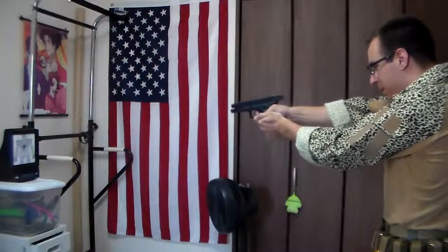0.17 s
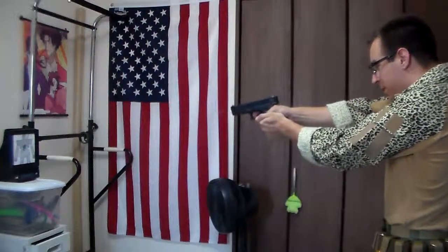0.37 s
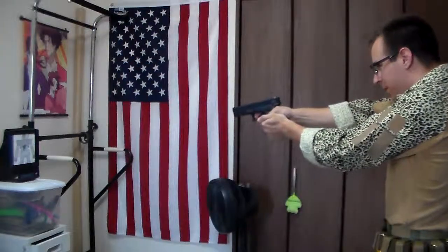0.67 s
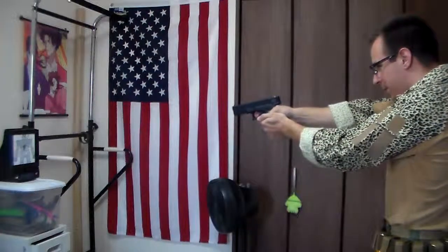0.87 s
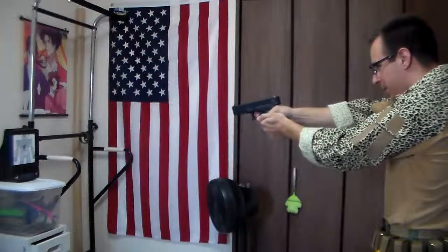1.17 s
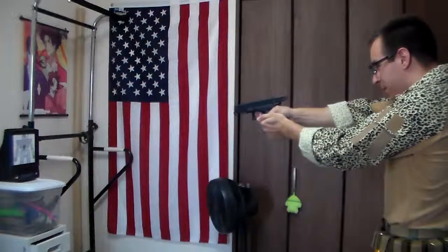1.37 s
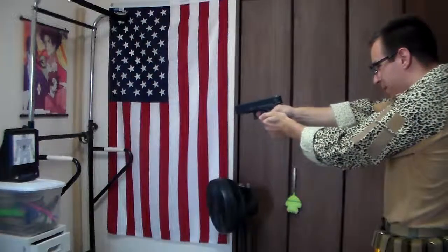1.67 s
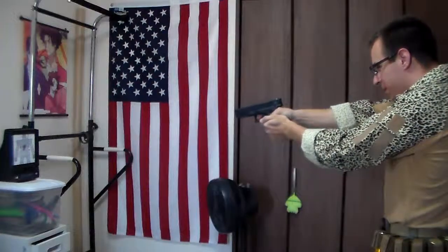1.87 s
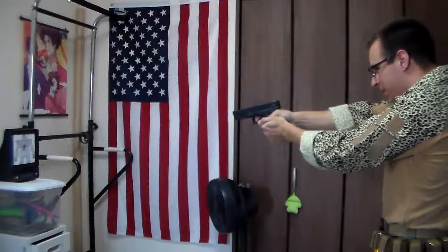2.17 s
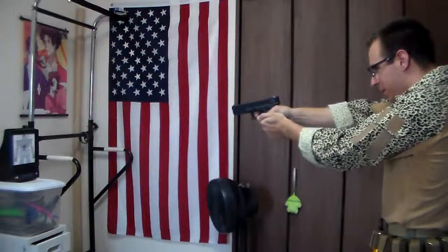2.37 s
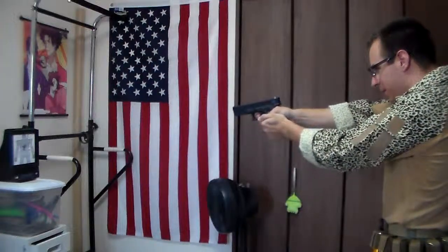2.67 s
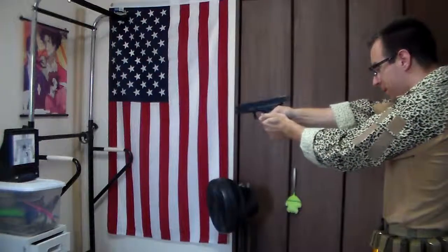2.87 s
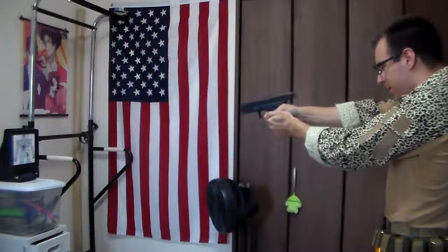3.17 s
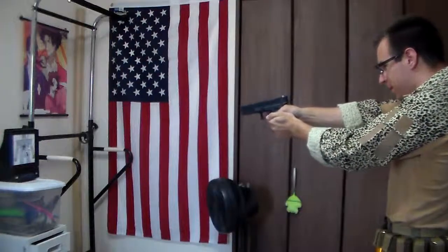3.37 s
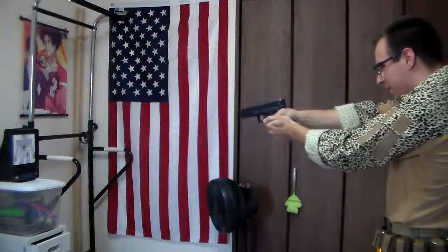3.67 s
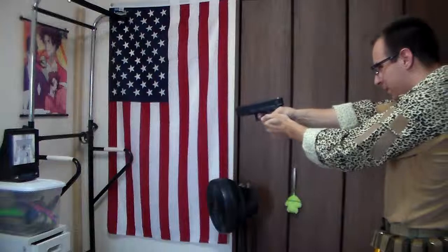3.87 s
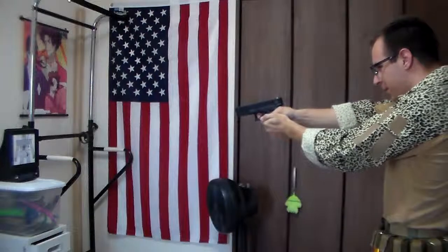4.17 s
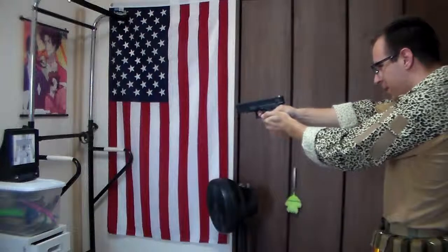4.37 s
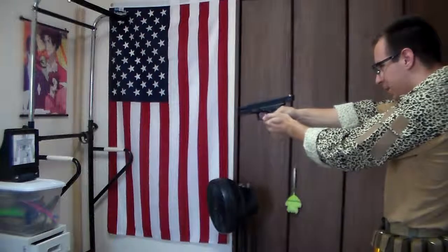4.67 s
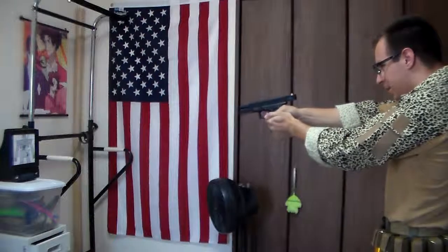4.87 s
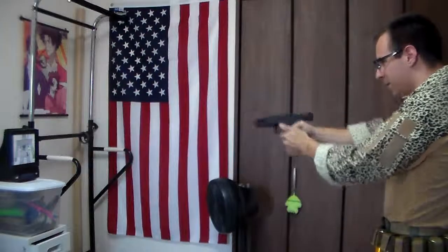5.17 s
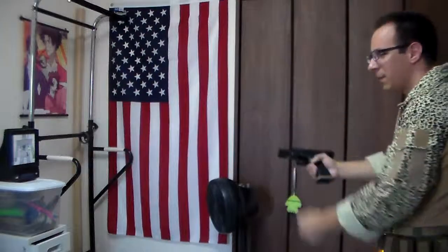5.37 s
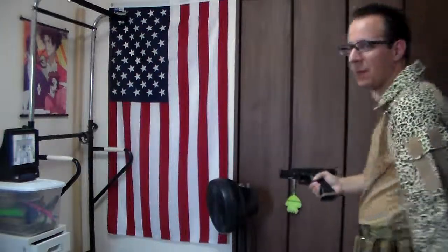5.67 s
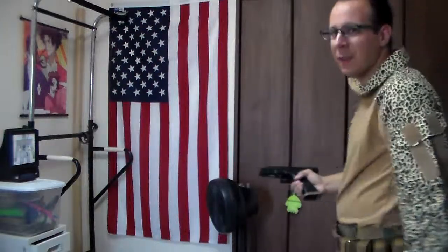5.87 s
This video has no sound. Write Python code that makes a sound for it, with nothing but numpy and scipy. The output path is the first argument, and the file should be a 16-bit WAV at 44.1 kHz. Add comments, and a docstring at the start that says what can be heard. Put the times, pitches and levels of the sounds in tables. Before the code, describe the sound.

A close stereo microphone in a small, dry room, with faint low rumble and hiss underneath. Almost at once, 0.07 s, a gas pellet pistol fires six rounds in about 0.3 s: a sharp opening crack, then a buzzing chain of gas bursts, metallic slide clatter and boxy low thumps. From 0.46 to 1.45 s plastic pellets click, bounce and roll on a ringing panel. A seven-round burst runs from 1.47 to 1.8 s, with pellets pattering and fading until 2.75 s. A mechanism click at 2.86 s leads into eleven rounds, 2.91 to 3.5 s, slowing and weakening slightly; duller landings and brief rolling follow, thinning by 4.4 s. A click at 4.68 s, then one crisp shot at 4.72 s. The background dips nearly silent around 5.2 s, then bright pellet ticks at 5.23-5.48 s, soft rustle, dull knocks and small metal clicks until 6 s.

```python
"""A gas blowback pistol fires three quick bursts and one last shot in a small, dry room.
Each shot layers a hammer tick, a ringing muzzle crack, gas and slide clatter, and a low thump of room modes.
After the shots plastic pellets click, roll and patter on a ringing panel, made of impulses and resonators.
Mechanism clicks precede later bursts and follow the last shot; a low rumble and hiss lie underneath."""
import sys
import numpy as np
from scipy import signal
from scipy.fft import rfft, irfft
from scipy.io import wavfile

SR = 44100
rng = np.random.default_rng(int(sys.argv[2]) if len(sys.argv) > 2 else 0)


def put_to_file(sound):
    """Save the sound as 16-bit audio at rate SR, in the file named by the first command-line argument."""
    columns = np.atleast_2d(sound).T  # one column per channel
    safe = np.clip(columns, -1, 1)
    whole_steps = np.round(safe * 32767)
    wavfile.write(sys.argv[1], SR, whole_steps.astype(np.int16))


def field_ratio(decibels):
    """Amplitude ratio for a level in dB (20 dB per decade); scalars and array-likes work."""
    return 10 ** (np.asarray(decibels, dtype=float) / 20)


N = 265261

# Levels in dB are relative, ahead of each layer's filters and mix gain.
# Burst timing: first_crack_s, rounds, first_cycle_s, lengthening_per_cycle_s
BURST_TIMING = [(.066, 6, .0483, .0006), (1.4664, 7, .0501, .0002), (2.911, 11, .0515, .0007),
                (4.7182, 1, .05, 0)]
# Burst strength: clatter_db, last_round_loss_db, opening_crack_db
BURST_STRENGTH = [(-18.5, -1, -3), (-19.5, 9, -2.5), (-20, 6, -2.5), (-23, -2, -2)]
# Clatter colour: freq_hz, density_db_per_hz
CLATTER_COLOUR = [(320, -54.5), (550, -9.5), (694, -11), (964, -5), (2250, 1.5), (3220, -2), (3590, 3.5),
                  (4230, 0.5), (6040, 2.5), (13500, -6.5), (14500, -22)]
# Slide resonances: freq_hz, width_hz, level_db
SLIDE_MODES = [(1921, 53, 3), (2540, 27, -12), (2960, 120, 5), (3860, 120, -1), (4320, 20, -15),
               (6000, 24, -11)]
# Top hiss of the gas against the clatter, one entry per burst: level_db
GAS_HISS_DB = [-8.5, -2.5, -11, -9]
# Low pushes in one cycle, from gas release, pellet impact and slide stops: lag_from_crack_s, level_db
CYCLE_PUSHES = [(-.0035, -2), (.0085, 2), (0.0129, -6), (0.0211, 2.5), (.030, -16.5), (0.041, -6.5)]
# Low room modes: freq_hz, width_hz, level_db
LOW_MODES = [(327, 69, -3), (372, 34, 1.5), (421, 18, 3), (496, 30, -1.5), (532, 105, -10), (628, 22, -4),
             (700, 18, -1), (797, 143, -6.5), (995, 180, -7)]
# Lowest room modes, beating: freq_hz, width_hz, level_db
LOWEST_MODES = [(89.7, 6.7, -12.5), (194, 6.7, 0), (228.7, 6.4, 1)]
# Pellets landing: start_s, level_db, brightness_db, panel_ring_db
PELLET_LANDINGS = [(0.4643, -22, 5, -7), (.4965, -33.5, 16, 6), (.636, -21, -2, -3.5),
                   (0.6793, -18.5, -3.5, -8), (0.6883, -18, 1, -5), (.829, -23, -3, -4),
                   (0.9781, -30.5, 4, 4.5), (1.044, -35, 6.5, 8), (1.2582, -21.5, -2.5, -5),
                   (1.9732, -16.5, 4, -12), (2.0468, -21, -1, -4.5), (2.0794, -23, -4.5, -6),
                   (2.2279, -26, 6, 1), (2.369, -49, -11, 3), (2.4715, -37, -6, -3.5),
                   (2.5993, -40, -4, 1.5), (3.676, -28.5, -13, -12), (3.739, -21, -3, -11),
                   (3.804, -28.5, -0.5, -3), (3.829, -30.5, -1, -1), (3.93, -38.5, 2, 1.5),
                   (3.947, -41, 4, 2), (4.144, -50.5, -4.5, 1.5), (4.2123, -37.5, -10.5, -8.5),
                   (4.2457, -46.5, -4.5, 1), (4.9921, -39.5, 7.5, -3.5), (5.2329, -29, -1, -3.5),
                   (5.345, -32.5, -3, -2.5), (5.3725, -22.5, 6, 2), (5.3852, -33, -5, -1),
                   (5.4103, -33, 10, -8), (5.4302, -31, 2, 4.5), (5.4596, -30.5, 5, 3),
                   (5.4778, -48, -5, -1)]
# Panel resonances: freq_hz, width_hz, level_db
PANEL_MODES = [(1766, 190, -11), (2508, 160, -3), (2708, 80, 2), (2822, 79, 0.5), (3112, 66, -1),
               (3531, 66, 4.5), (3740, 540, -4.5), (4360, 200, -4), (5230, 310, -6), (5680, 240, -2.5),
               (6960, 560, -8.5), (8240, 380, -6)]
# Pellets rolling on the panel: start_s, stop_s, start_db, stop_db, second_group_db
ROLLS = [(.49, .52, -31.5, -55, -11), (0.64, 1.459, -39.5, -44, 1), (2.045, 2.751, -44.5, -54.5, -1),
         (3.58, 3.862, -47.5, -49.5, -0.5), (3.93, 4.03, -43, -71, -6), (4.215, 4.415, -60, -70, -6),
         (5.235, 5.34, -52, -52, -6), (5.384, 5.517, -45, -66, -2)]
# Edges of the second resonance group of the rolls: low_hz, high_hz
SECOND_GROUP_HZ = (3250, 4000)
# Fine patter and rustle: start_s, stop_s, start_db, stop_db
RUSTLE_STRETCHES = [(.47, 1.46, -42.5, -47), (1.82, 2.4, -45, -55), (3.54, 3.85, -37, -67.5),
                    (5.24, 5.33, -50, -61), (5.38, 5.58, -40, -62), (5.6, 6.01, -60, -64.5)]
# Rustle colour: freq_hz, density_db_per_hz
RUSTLE_SPECTRUM = [(290, -61), (500, -23), (2130, -8.5), (2360, -10), (2830, -4.5), (4020, -10.5),
                   (6870, -7.5), (14500, -22)]
# Dull knocks: start_s, level_db
DULL_KNOCKS = [(3.676, -37), (3.817, -52.5), (5.565, -45.5), (5.739, -49.5), (5.769, -53)]
# Band left of a knock: low_hz, high_hz
KNOCK_BAND_HZ = (250, 1000)
# Trigger, slide catch and magazine clicks: start_s, level_db, brightness_db
MECHANISM_CLICKS = [(1.4314, -49.5, 1), (2.8594, -32.5, -9), (4.6799, -28.5, -6.5), (5.5571, -32, -3),
                    (5.569, -33.5, -1), (5.7599, -37.5, -3), (5.844, -45, -10), (5.9374, -41, -3)]
# Room decay: freq_hz, t60_s
ROOM_DECAY = [(120, 0.22), (700, 0.28), (3000, 0.25), (12000, 0.25)]
# Likeness of left and right, for tail and room tone: freq_hz, correlation
STEREO_LIKENESS = [(30, 0.77), (125, 0.76), (300, 0.88), (700, 0.92), (1400, 0.97), (2500, 0.97),
                   (5000, 0.48), (8000, 0.026)]
# Room tone level, sinking after the last shot and jumping back: time_s, level_db
ROOM_TONE_LEVEL = [(0, -51.5), (2.8, -53.5), (4.7, -54), (4.8, -59), (5.205, -79), (5.211, -56),
                   (6.02, -50.5)]
# Room tone colour: freq_hz, density_db_per_hz
ROOM_TONE_COLOUR = [(12, -25.5), (20, 5), (39, -7.5), (60, -10.5), (102, -16.5), (546, -24), (610, -27),
                    (681, -23), (1280, -30.5), (2700, -32), (2930, -34.5), (14500, -48.5)]

# Sag per round as the gas cools
CLATTER_SAG_DB, THUMP_SAG_DB = 0.17, 0.63
# Thump against clatter, and its multiple of the last-round loss
THUMP_DB, THUMP_LOSS = -6.5, 1.5
OPENING_THUMP_DB = 2  # a full charge makes the first round of a burst thump harder
LATER_CRACK_DB, ROUND_SPREAD_DB = -14, 0.6
VALVE_LEAD_S, VALVE_DB = 0.0035, 4  # gas hisses from the valve until the crack
LULL_S, LULL_DB = 0.0018, -24.5  # a short lull after the crack
# The slide slams back, fades and comes home
SLAM_S, SLAM_DB, SLAM_FADE_DB_PER_S, HOME_S, EDGE_S = 0.0032, 5, 480.5, 0.043, 0.002
GAS_HZ = 8790
CRACK_HZ, CRACK_DECAY_S = 3500, 0.00023
HAMMER_LEAD_S, HAMMER_HZ, HAMMER_DECAY_S, HAMMER_DB = 0.00303, 1730, 0.00015, -9
# Low-middle and middle ranges of a hard click
CLICK_LOW_DB, LANDING_MID_DB, MECHANISM_MID_DB = -2.5, -5.5, 2
ROLL_TOP_DB = -9.5  # rolling hardly rings the top resonances
SWELL_S = 0.027  # rolls and patter set in and end over this time
HISS_DB = -63
STOPBAND_HZ = 14350


def rms_one(x):
    """Scale to unit rms."""
    return x / np.sqrt(np.mean(x ** 2) + 1e-20)


def at_hz(points, hz):
    """Read a curve on a log-frequency axis."""
    point_hz, value = np.transpose(points)
    return np.interp(np.log(hz), np.log(point_hz), value)


def butter_filter(x, order, hz, kind):
    """Butterworth filter with a flat passband."""
    return signal.sosfilt(signal.butter(order, hz, kind, fs=SR, output="sos"), x)


def gain_curve(tables):
    """Sum gain envelopes from lists of (s, dB) rows, practically silent outside them."""
    t = np.arange(N) / SR
    return sum(field_ratio(np.interp(t, *np.transpose(rows), left=-200, right=-200)) for rows in tables)


def stretches(rows):
    """Envelope of sounds that set in, glide from one level to another and end."""
    return gain_curve([
        [(start - SWELL_S, start_db - 30), (start, start_db), (stop, stop_db), (stop + SWELL_S, stop_db - 30)]
        for start, stop, start_db, stop_db in rows])


def coloured(x, spectrum):
    """Give a white signal a spectrum in dB per Hz; rms 1."""
    hz = np.maximum(np.arange(N // 2 + 1) * SR / N, 1)
    return rms_one(irfft(rfft(x) * field_ratio(at_hz(spectrum, hz)), N))


def resonate(x, modes):
    """Parallel two-pole resonances of alternating sign; bandwidth sets the ring time."""
    out = 0
    for k, (hz, width, db) in enumerate(modes):
        radius = np.exp(-np.pi * width / SR)
        top = (-1) ** k * field_ratio(db) * (1 - radius * radius) / 2
        poles = [1, -2 * radius * np.cos(2 * np.pi * hz / SR), radius * radius]
        out = out + signal.lfilter([top, 0, -top], poles, x + 1e-18)
    return out


def grains(per_s, spread_db):
    """Random clicks of uneven size and sign; rms 1."""
    size = field_ratio(spread_db * np.minimum(rng.exponential(1, N), 5))
    sign = rng.choice([-1, 1], N)
    return rms_one(size * sign * (rng.random(N) < per_s / SR))


def clicks(times, gains):
    """A train of single-sample impulses."""
    out = np.zeros(N)
    out[np.round(np.asarray(times) * SR).astype(int)] = gains
    return out


def hard_clicks(rows, mid_db):
    """A hard contact in three ranges; brightness trades low middle for treble."""
    s, db, bright_db = np.transpose(rows)[:3]
    ranges = [(CLICK_LOW_DB - bright_db, (900, 2200)), (mid_db, (2200, 4800)), (bright_db, (4800, 13000))]
    out = 0
    for share_db, edges_hz in ranges:
        # alternate signs so that the ranges join
        out = butter_filter(clicks(s, field_ratio(db + share_db)), 2, edges_hz, "band") - out
    return out


def shots():
    """As the gas cools, each cycle is slower and weaker: rows of start_s, clatter_db, thump_db, crack_db."""
    rows = []
    for timing, strength in zip(BURST_TIMING, BURST_STRENGTH):
        first_s, count, cycle_s, slower_s = timing
        db, loss_db, crack_db = strength
        k = np.arange(count)
        loss = loss_db * (k == count - 1)
        start_s = first_s + cycle_s * k + slower_s * k * (k - 1) / 2
        clatter_db = db - CLATTER_SAG_DB * k - loss
        thump_db = db + THUMP_DB - THUMP_SAG_DB * k - THUMP_LOSS * loss + OPENING_THUMP_DB * (k == 0)
        # a burst opens with its sharpest crack
        rows.append(np.c_[start_s, clatter_db, thump_db, np.where(k, LATER_CRACK_DB, crack_db)])
    rows = np.vstack(rows)
    return rows + ROUND_SPREAD_DB * rng.standard_normal(rows.shape) * [0, 1, 1, 0]


def cracks(fired):
    """The hammer knocks the valve; then a suction pulse at the muzzle rings about one cycle."""
    s, gain = fired[:, 0], field_ratio(fired[:, 3])
    t = np.arange(SR // 100) / SR
    muzzle = -np.cos(2 * np.pi * CRACK_HZ * t) * np.exp(-t / CRACK_DECAY_S)
    hammer = field_ratio(HAMMER_DB) * np.sin(2 * np.pi * HAMMER_HZ * t) * np.exp(-t / HAMMER_DECAY_S)
    muzzle_train = np.convolve(clicks(s, gain), muzzle)
    hammer_train = np.convolve(clicks(s - HAMMER_LEAD_S, gain), hammer)
    return (muzzle_train + hammer_train)[:N]


def clatter(fired):
    """Gas noise and metal contacts follow the slide cycle; the contacts also ring the slide."""
    home_db = SLAM_DB - SLAM_FADE_DB_PER_S * (HOME_S - SLAM_S)
    cycle = [(-VALVE_LEAD_S - EDGE_S, VALVE_DB - 29), (-VALVE_LEAD_S, VALVE_DB), (0, VALVE_DB),
             (LULL_S, LULL_DB), (SLAM_S, SLAM_DB), (HOME_S, home_db), (HOME_S + 6 * EDGE_S, home_db - 30)]
    lag, shape_db = np.transpose(cycle)
    effort = gain_curve([np.c_[s + lag, db + shape_db] for s, db, *_ in fired])
    contacts = grains(5000, spread_db=3.0)
    gas = field_ratio(-7.5) * rng.standard_normal(N)
    broad = effort * coloured(contacts + gas, CLATTER_COLOUR)
    ring = field_ratio(-8.0) * resonate(effort * contacts, SLIDE_MODES)
    burst = np.searchsorted([1, 2.5, 4], np.arange(N) / SR)  # times between bursts, s
    hiss = butter_filter(rng.standard_normal(N), 2, GAS_HZ, "high")
    return broad + ring + effort * field_ratio(GAS_HISS_DB)[burst] * hiss


def thump(fired):
    """Nearly alike pushes in every cycle ring the low modes; the gas release alone rings the lowest."""
    s, _, db, _ = fired.T[:, :, None]
    lag, push_db = np.transpose(CYCLE_PUSHES)
    # spread of each push: 0.0003 s in time, 1.2 dB in level
    chance = rng.standard_normal((len(fired), 2, len(CYCLE_PUSHES))) * [[0.0003], [1.2]]
    pushes = clicks(s + lag + chance[:, 0], field_ratio(db + push_db + chance[:, 1]))
    releases = clicks(s + lag[0], field_ratio(db))
    return resonate(pushes, LOW_MODES) + field_ratio(5) * resonate(releases, LOWEST_MODES)


def pellet_landings():
    """A landing pellet clicks and rings the panel."""
    s, db, _, ring_db = np.transpose(PELLET_LANDINGS)
    ring = resonate(clicks(s, field_ratio(db + ring_db)), PANEL_MODES)
    return hard_clicks(PELLET_LANDINGS, LANDING_MID_DB) + field_ratio(16) * ring


def rolling():
    """Dense tiny bounces keep the panel ringing; a double resonance leaves dark valleys."""
    ring = resonate(grains(1500, spread_db=3.0), PANEL_MODES)
    ring = rms_one(resonate(ring, PANEL_MODES))
    lower = butter_filter(ring, 4, SECOND_GROUP_HZ[0], "low")
    second = butter_filter(ring, 4, SECOND_GROUP_HZ, "band")
    top = butter_filter(ring, 4, SECOND_GROUP_HZ[1], "high")
    rows = np.array(ROLLS)
    # each roll sets the second group against the others
    second_rows = rows[:, :4] + rows[:, 4:] * [0, 0, 1, 1]
    return stretches(rows[:, :4]) * (lower + field_ratio(ROLL_TOP_DB) * top) + stretches(second_rows) * second


def rustle():
    """Fine patter of scattering pellets, later of cloth and hands, from coloured grains."""
    return stretches(RUSTLE_STRETCHES) * coloured(grains(1400, spread_db=4.5), RUSTLE_SPECTRUM)


def knocks():
    """Soft contacts: a click with only its low middle left."""
    s, db = np.transpose(DULL_KNOCKS)
    return butter_filter(clicks(s, field_ratio(db)), 2, KNOCK_BAND_HZ, "band")


def handling():
    """Clicks of the mechanism, with some ring of the slide."""
    s, db, _ = np.transpose(MECHANISM_CLICKS)
    ring = resonate(clicks(s, field_ratio(db)), SLIDE_MODES)
    return hard_clicks(MECHANISM_CLICKS, MECHANISM_MID_DB) + field_ratio(7) * ring


def stereo_bands(t60_of, size):
    """Half-octave bands of noise at two close microphones, each dying with its own t60."""
    out = 0
    t = np.arange(size) / SR
    edges = 20 * 2 ** np.arange(0, 10, 0.5)
    white = rng.standard_normal((2, 2, size))
    for k, (low, high) in enumerate(zip(edges, np.append(edges[1:], 0.45 * SR))):
        # neighbouring bands take different noise
        mid, side = butter_filter(white[k % 2], 2, [low, high], "band")
        hz = np.sqrt(low * high)
        alike = np.clip(at_hz(STEREO_LIKENESS, hz), 0, 1)
        pair = np.sqrt(1 + alike) * mid + np.sqrt(1 - alike) * side * [[1], [-1]]
        out = out + pair * field_ratio(-60 * t / t60_of(hz))
    return out


def room(x, direct_db, count):
    """Direct sound plus diffuse tails; each 10 ms takes one at random, which evens the room's colour."""
    out = field_ratio(direct_db) * x
    choice = np.repeat(rng.integers(0, count, N // 441 + 1), 441)[:N]
    for k in range(count):
        tail = stereo_bands(lambda hz: at_hz(ROOM_DECAY, hz), size=SR // 3)
        tail = tail / np.sqrt(np.sum(tail ** 2) / 2)
        out = out + signal.oaconvolve((x * (choice == k))[None], tail, axes=1)[:, :N]
    return out


def room_tone():
    """Low rumble and air noise over steady microphone hiss."""
    noise = stereo_bands(lambda hz: np.inf, size=N)  # endless t60: no decay
    air = gain_curve([ROOM_TONE_LEVEL]) * coloured(noise, ROOM_TONE_COLOUR)
    return air + field_ratio(HISS_DB) * rng.standard_normal((2, N))


def scene():
    """All sources share one room; cracks and thumps also come straight, and room tone lies beneath."""
    fired = shots()
    crack = cracks(fired)
    low = field_ratio(39.5) * thump(fired)
    # single clicks need large gains, as filters and tail spread them out
    hard = field_ratio(15.0) * (pellet_landings() + handling())
    small = hard + field_ratio(41.0) * knocks() + rolling() + rustle()
    near = clatter(fired) + crack + field_ratio(-19.0) * low + small
    return crack + low + room(near, direct_db=-10, count=6) + room_tone()


def band_limit(x):
    """A steep low-pass at the top of the band."""
    return signal.sosfilt(signal.butter(12, 15430, fs=SR, output="sos"), x)


def record(dry):
    """A steep low-pass holds everything above its stopband edge at least 28 dB down."""
    low_pass = signal.cheby2(10, 28, STOPBAND_HZ, fs=SR, output="sos")
    mix = signal.sosfilt(low_pass, dry)
    return band_limit(mix)


dry = scene()
out = record(dry)
put_to_file(out)
```